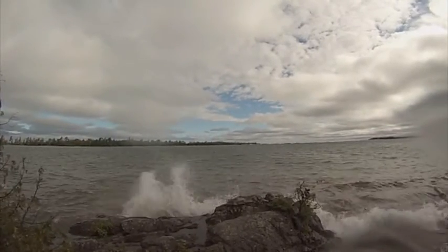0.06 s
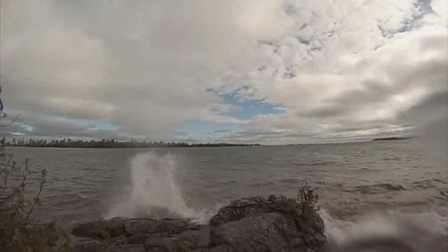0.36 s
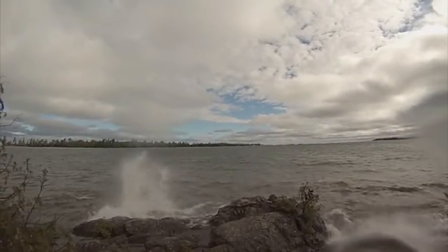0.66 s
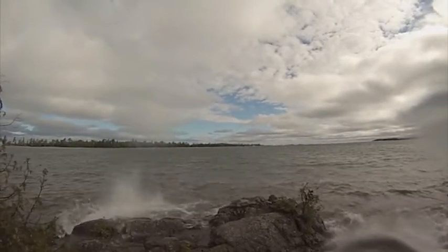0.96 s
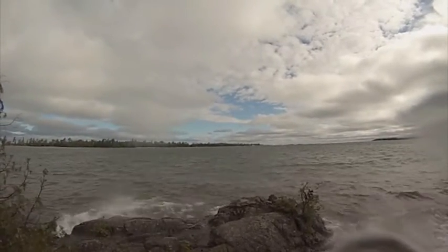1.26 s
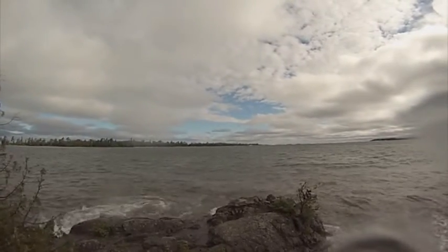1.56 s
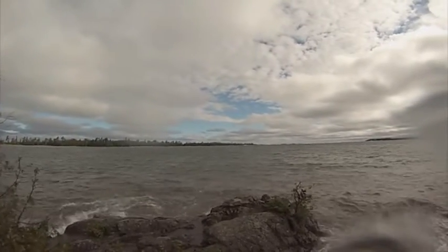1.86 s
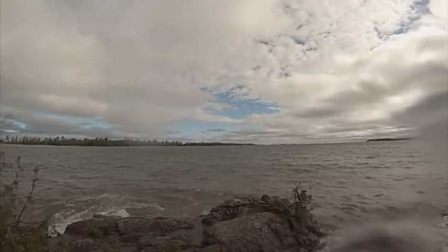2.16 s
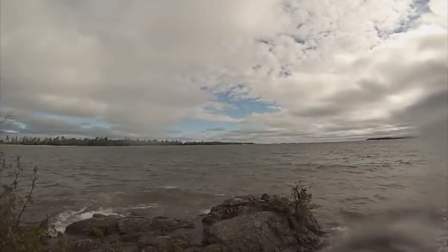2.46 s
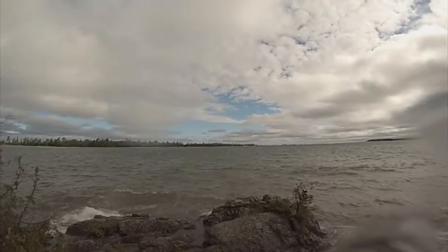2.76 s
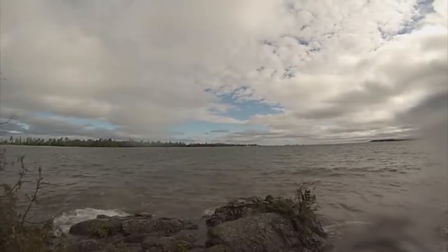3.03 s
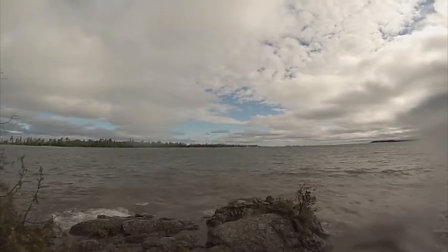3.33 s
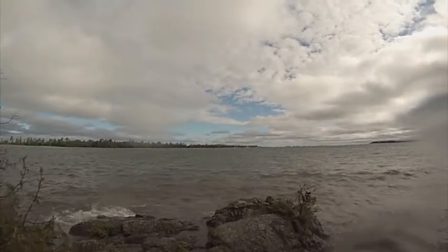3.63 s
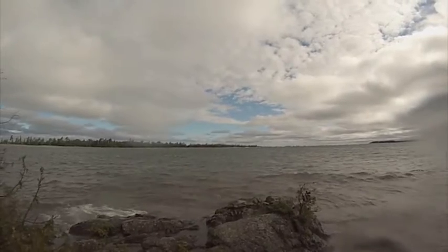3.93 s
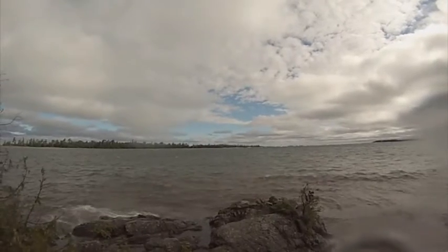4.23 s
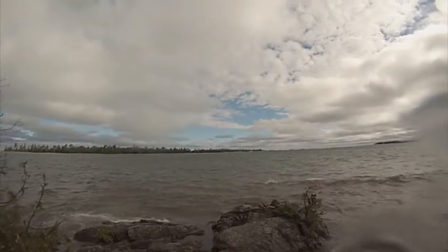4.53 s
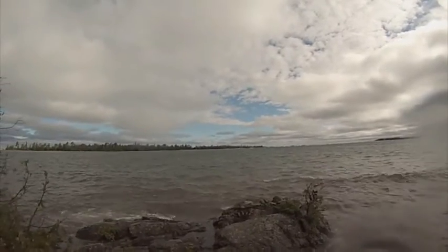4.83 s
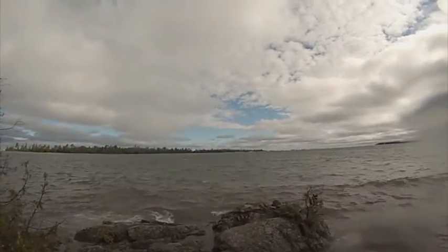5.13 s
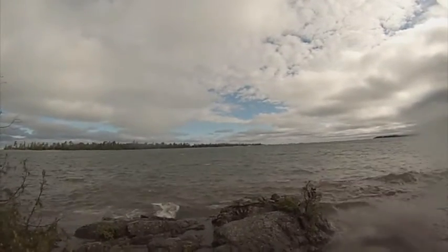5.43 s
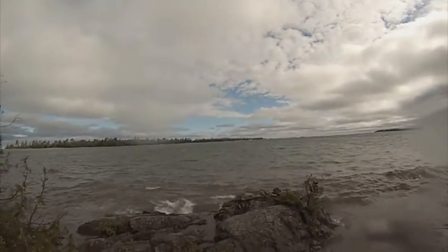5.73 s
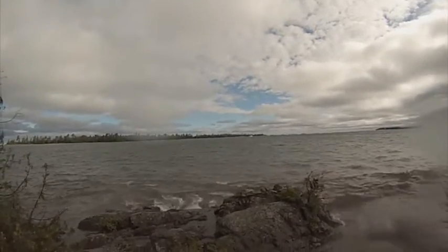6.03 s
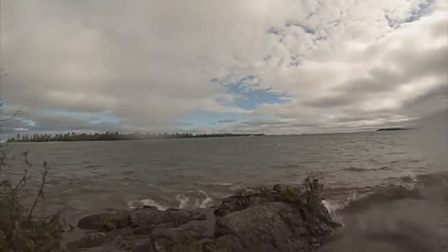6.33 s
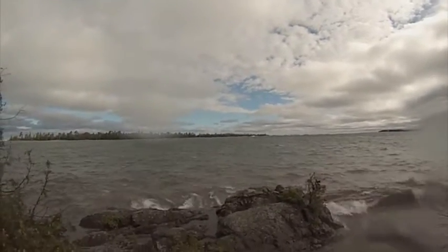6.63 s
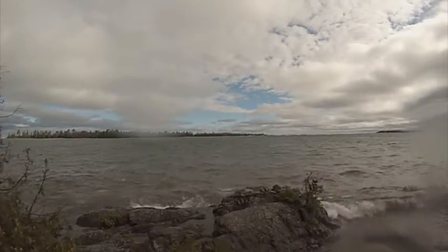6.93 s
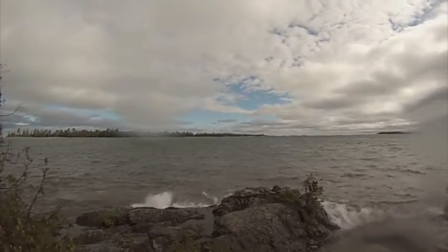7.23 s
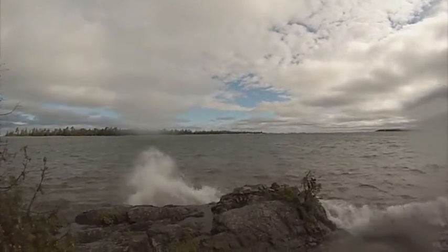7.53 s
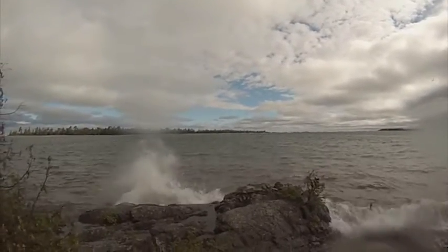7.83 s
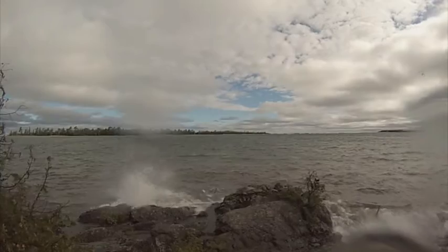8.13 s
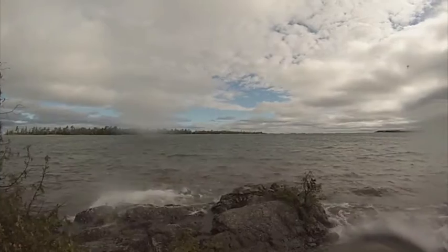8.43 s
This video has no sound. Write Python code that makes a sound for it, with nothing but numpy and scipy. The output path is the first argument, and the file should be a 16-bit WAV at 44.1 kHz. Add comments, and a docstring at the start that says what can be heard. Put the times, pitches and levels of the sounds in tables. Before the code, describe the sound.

Heard from inside a hollow waterproof case at the edge of a windy lake, a wave breaks on rocks with a low churn, bubbling foam and spray. It eases into gurgling small waves over a steady distant wash. Wind buffets the microphone more strongly, and a handful of sharp drop knocks and dull bumps strike the case. Then the water builds and another wave crashes, foaming and hissing.

```python
"""Wind-driven waves break on a rocky lake shore, heard from inside a hollow waterproof case.
At the start a big wave churns, foams with bubbles and throws up spray; fine drops tick as it drains.
Then small waves slosh, the lake washes on and gusts buffet the case. From about 4 s flying drops
knock on the case, soft bumps rock it and the next crest sizzles. That wave breaks at 7.2 s.
The case rings at its own pitches, which colours the sound of the water."""
import sys
import numpy as np
from scipy import signal
from scipy.io import wavfile
from scipy.ndimage import uniform_filter1d

SR = 44100
rng = np.random.default_rng(int(sys.argv[2]) if len(sys.argv) > 2 else 0)


def persist_wave(psi):
    """Save psi, clipped to +-1, as 16-bit WAV."""
    counts = np.round(np.clip(psi, -1, 1) * 32767).astype(np.int16)
    wavfile.write(sys.argv[1], SR, np.atleast_2d(counts).T)


N = 373968
TIME = np.arange(N) / SR

# big waves hitting the rocks: hit_s, strength_db, spray_stays_up_s, side_wash_db
BIG_WAVES = [(-0.2, -0.4, 1.39, -54.5), (7.2, -0.44, 1.19, -53)]
# small waves sloshing over the rocks: peak_s, level_db
SMALL_WAVES = [(0.42, -57), (1.12, -56.5), (1.88, -55.5), (2.83, -57), (3.448, -56), (3.97, -57.5),
               (4.55, -54.5), (5.3, -57), (5.85, -54), (7.2, -52.5), (8.06, -49)]
# how strong each sound is from low to high, in the open air: pitch_hz, relative_db
CHURN_TONE = [(60, -0.5), (150, -1), (290, -1), (450, -6), (700, -9.5), (1000, -10.5), (1400, -18.5),
              (3000, -37)]
FOAM_TONE = [(200, -3), (700, -10), (1000, -5.5), (1250, -3.5), (1600, 3.5), (2100, -2), (2800, -11),
             (4000, -15), (7000, -24), (15000, -46)]
SPRAY_TONE = [(1000, -9), (2200, -10.5), (3100, 3.5), (4200, -3), (5500, -2), (7000, -10), (8700, -14),
              (10500, -21.5), (12500, -29), (15000, -50)]
WIND_TONE = [(15, 11), (28, 0), (50, 3.5), (85, 0.5), (130, -7), (200, -15.5), (320, -26), (600, -33),
             (1500, -47)]
SPATTER_TONE = [(1800, 9), (5000, -1), (9000, -17), (13000, -21)]
LAKE_TONE = [(300, -7), (900, -1.5), (1700, 7.5), (2200, 3), (2900, -7), (4200, -12), (5500, -16),
             (7500, -20.5), (10000, -23), (13000, -25), (15000, -36)]
# pitches the hollow case boosts or weakens: pitch_hz, width_hz, gain_db
CASE_COLOUR = [(1250, 210, -7.5), (1530, 640, 8), (2130, 730, 3.5), (2520, 820, -2), (3593, 880, 7.5),
               (4150, 450, -4.5), (4910, 510, 6), (5400, 220, 0), (5580, 280, 1.5), (6250, 290, -8),
               (6530, 650, 4.5), (7680, 550, 4.5), (8800, 460, -2.5), (10440, 560, -3.5), (11160, 800, 2),
               (12250, 430, -8), (13000, 650, 0)]
# pitches of the case that a wash from the side stirs: pitch_hz, width_hz, relative_db
SIDE_RINGS = [(1580, 340, 0), (3560, 410, -7.5), (4730, 280, -10.5), (7650, 420, -15.5), (11300, 900, -30)]
# the breeze on the case: time_s, strength_db
BREEZE_CURVE = [(0, -50.5), (1.1, -56.5), (2.1, -52), (2.9, -44), (3.5, -43.5), (3.85, -49), (4.15, -41.5),
                (4.8, -45), (5.6, -45.5), (6.8, -45), (7.8, -48.5), (8.48, -49)]
# gusts on top of the breeze: peak_s, strength_db, half_length_s
WIND_GUSTS = [(0.35, -50, 0.032), (0.63, -49, 0.071), (0.86, -50.5, .07), (1.32, -48, 0.093),
              (1.81, -48.5, 0.08), (2.31, -45, 0.042), (2.53, -49, 0.089), (2.88, -44, 0.079),
              (3.45, -44.5, 0.044), (4.64, -40, 0.14), (5.09, -35, 0.027), (5.29, -41, 0.092),
              (5.82, -44.5, 0.14), (6.29, -43.5, 0.12), (7.24, -43.5, 0.095), (7.46, -44, .05),
              (8.08, -40, 0.046)]
# drops knocking on the case: start_s, force_db, contact_s, push_or_pull (+1 or -1), linger_share (0-1)
DROP_KNOCKS = [(4.3683, -19, 0.00068, -1, 0.3), (4.4722, -28, 0.00086, -1, 0.8),
               (5.2997, -14.5, 0.00059, 1, 0), (5.6811, -17.5, 0.00072, -1, 1),
               (6.9927, -13, 0.00053, -1, 0.21)]
# soft bumps on the case: same columns as the knocks
SOFT_BUMPS = [(4.548, -26.5, 0.0097, -1, 0.2), (4.593, -22, 0.0081, 1, 0), (4.6338, -25.5, 0.0029, -1, 0.7),
              (5.087, -22.5, 0.006, 1, 0.5), (5.122, -23.5, 0.015, 1, .1), (5.356, -25, 0.0036, 1, 0.5),
              (6.9965, -28, 0.0069, -1, 0), (8.085, -26, 0.019, 1, 0.3)]
# spurts of hiss from the incoming crest: peak_s, level_db, half_length_s
CREST_SPURTS = [(4.7, -71, .25), (5.55, -68, 0.25), (6.31, -57, 0.15), (6.5, -62, .15)]
# small showers landing nearby: peak_s, level_db, half_length_s
SHOWERS = [(1.918, -53.5, 0.054), (3.86, -63, 0.065), (4.094, -58, 0.014)]
# fine drops ticking close by: start_s, peak_db, pitch_hz
DROP_TICKS = [(1.672, -43.5, 6800), (1.692, -52, 11400), (1.770, -52, 11800), (1.900, -49, 8800),
              (1.921, -51, 11200), (2.132, -61, 11500), (2.173, -57, 10500), (2.215, -58, 11900)]

WAVE_HOLD_S = 0.69  # how long a big wave stays at full strength
CUTOFF_HZ = 15100  # the top of the treble


def churn():
    """Heaving water rumbles, and large air pockets gulp in it."""
    big_db = [wave_db(s, db - 50.5, rise_db_per_s=5.5, hold_s=WAVE_HOLD_S, fall_db_per_s=7.5)
              for s, db, _, _ in BIG_WAVES]
    level_db = together(-57.5, slosh_db() - 1.5, *big_db)  # some rumble stays between waves
    rumble = rush(CHURN_TONE, surge_db=-0.1, surge_hz=6.8, flicker_db=1.13, flicker_hz=17)
    gulps = bubbles(CHURN_TONE, per_s=300, low_hz=198, high_hz=1218, cycles=17, size_db=4)
    return from_db(level_db) * in_case(rumble + from_db(-9) * gulps)


def foam():
    """A breaking wave whips up a crowd of small, ringing bubbles."""
    levels_db = [wave_db(s, db - 52.18, rise_db_per_s=6.5, hold_s=WAVE_HOLD_S, fall_db_per_s=5.5)
                 for s, db, _, _ in BIG_WAVES]
    wash = rush(FOAM_TONE, surge_db=1.4, surge_hz=13, flicker_db=1.8, flicker_hz=16)
    froth = bubbles(FOAM_TONE, per_s=2500, low_hz=705, high_hz=4330, cycles=15, size_db=2.5)
    return from_db(together(*levels_db)) * in_case(wash + from_db(-2.5) * froth)


def spray():
    """A plume of drops hisses as it falls back; a fainter fizz comes earlier and outlasts it."""
    lead_s = 0.35  # the crest sheds spray just ahead of the hit
    levels_db = []
    for s, db, up_s, _ in BIG_WAVES:
        plume_db = wave_db(s - lead_s, db - 54.27, rise_db_per_s=12.5,
                           hold_s=lead_s + up_s, fall_db_per_s=50)
        fizz_db = wave_db(s, db - 58.77, rise_db_per_s=2, hold_s=up_s, fall_db_per_s=3.5)
        levels_db += [plume_db, fizz_db]
    hiss = rush(SPRAY_TONE, surge_db=1.1, surge_hz=9.5, flicker_db=1, flicker_hz=6.3)
    patter = bubbles(SPRAY_TONE, per_s=4300, low_hz=2530, high_hz=13700, cycles=3.2, size_db=1.5)
    return from_db(together(*levels_db)) * in_case(hiss + from_db(-4) * patter)


def side_wash():
    """Water arriving from the side makes a few of the case's pitches ring strongly."""
    levels_db = [wave_db(s, side_db, rise_db_per_s=11, hold_s=WAVE_HOLD_S, fall_db_per_s=15)
                 for s, _, _, side_db in BIG_WAVES]
    wash = rng.standard_normal(N) * from_db(drift(24))
    hollow = sum(from_db(db) * ring_twice(wash, hz, width_hz) for hz, width_hz, db in SIDE_RINGS)
    return from_db(together(*levels_db)) * rms_one(hollow)


def slosh_db():
    """The level of the small waves: each rises fast and drains more slowly."""
    levels_db = [wave_db(s, db, rise_db_per_s=49, hold_s=0, fall_db_per_s=23) for s, db in SMALL_WAVES]
    return together(-59, *levels_db)  # the water never rests


def backwash():
    """Small waves gurgle over the rocks, duller than the foam of a big one."""
    wash = rush(FOAM_TONE, surge_db=1.1, surge_hz=14, flicker_db=1.1, flicker_hz=14)
    gurgle = bubbles(FOAM_TONE, per_s=2000, low_hz=690, high_hz=2990, cycles=12, size_db=2.5)
    return from_db(slosh_db()) * in_case(low_pass(wash + from_db(-4.5) * gurgle, hz=4800))


def wind():
    """Swirls of air buffet the case; stronger gusts shed smaller, brighter swirls."""
    breeze_db = np.interp(TIME, *np.transpose(BREEZE_CURVE))
    strength_db = 20 * np.log10(np.hypot(from_db(breeze_db), swells(WIND_GUSTS)))
    swirls = rush(WIND_TONE, surge_db=1, surge_hz=29, flicker_db=1, flicker_hz=8.5)
    swirls /= np.sqrt(uniform_filter1d(swirls ** 2, size=5000))  # even out the slow swings
    small_swirls = low_pass(ring(rng.standard_normal(N), hz=195, width_hz=124), hz=450)
    flutter = rms_one(small_swirls * np.abs(swirls))  # small swirls ride on the large ones
    flutter_db = -11 + 0.5 * (strength_db + 31)
    return from_db(strength_db + 1.88) * (swirls + from_db(flutter_db) * flutter)


def touch_force(touches):
    """Each touch is a smooth hump of force, part of which lingers and drains away."""
    force = np.zeros(N)
    for start_s, db, contact_s, push_or_pull, linger_share in touches:
        progress = np.maximum(TIME - start_s, 0) / contact_s
        hump = np.sin(np.pi * np.minimum(progress, 1)) ** 2
        drain = progress ** 2 * np.exp(2 - 2 * progress)
        force += push_or_pull * from_db(db) * (hump + linger_share * drain)
    return force


def case_blows():
    """A blow squeezes the air in the case, rings its shell and rocks it on its mount."""
    force = touch_force(DROP_KNOCKS) + touch_force(SOFT_BUMPS)
    squeeze = signal.sosfilt(signal.butter(1, 50, "high", fs=SR, output="sos"), force)
    # the hollow soaks up its own note, leaving a ring on either side of it
    squeeze -= ring(squeeze, hz=1550, width_hz=340)
    shell = 1.82 * ring(squeeze, hz=1440, width_hz=286) + ring(squeeze, hz=1900, width_hz=260)
    mount = 0.3 * ring(force, hz=52, width_hz=38) + 0.5 * ring(force, hz=120, width_hz=160)
    return 0.57 * squeeze + shell + mount


def crest_sizzle():
    """The incoming crest gives off spurts of narrow, almost whistling hiss."""
    hiss = ring_twice(rng.standard_normal(N), hz=4990, width_hz=420)
    return swells(CREST_SPURTS) * rms_one(hiss)


def spatter():
    """A small shower of drops lands as a short, bright crackle."""
    drops = bubbles(SPATTER_TONE, per_s=2600, low_hz=1780, high_hz=12500, cycles=13, size_db=2.5)
    return swells(SHOWERS) * drops


def droplets():
    """Tiny drops burst with a short, bright tick."""
    out, fade_s = np.zeros(N), 0.00046
    for start_s, peak_db, hz in DROP_TICKS:
        fade = (TIME >= start_s) * np.exp(-np.abs(TIME - start_s) / fade_s)
        burst = rng.standard_normal(N) * fade
        tick = ring_twice(burst, hz, width_hz=1700) + 0.08 * low_pass(burst, hz=7000)
        out += from_db(peak_db) * tick / np.max(np.abs(tick))
    return out


def lake():
    """Distant waves wash on; coming from all sides, they take on less of the case's colour."""
    wash = rush(LAKE_TONE, surge_db=0.5, surge_hz=4.2, flicker_db=1.5, flicker_hz=20)
    return from_db(-56) * in_case(wash, depth=0.2)


def in_case(sound, depth=1):
    """The hollow case boosts some pitches and weakens others; the result has level one."""
    for hz, width_hz, db in CASE_COLOUR:
        gain = from_db(depth * db / 2)
        width = np.pi * width_hz / SR
        tuning = -2 * np.cos(2 * np.pi * hz / SR)
        sound = signal.lfilter([1 + width * gain, tuning, 1 - width * gain],
                               [1 + width / gain, tuning, 1 - width / gain], sound)
    return rms_one(sound)


def rush(tone, surge_db, surge_hz, flicker_db, flicker_hz):
    """Swirling water or air: bands of noise that surge together and flicker separately."""
    edges_hz = np.geomspace(14, 18000, 22)  # half an octave apart
    noise = rng.standard_normal((2, N))
    surge = from_db(surge_db * drift(surge_hz))
    out = np.zeros(N)
    for k, (low, high) in enumerate(zip(edges_hz, edges_hz[1:])):
        hz = np.sqrt(low * high)
        if tone[0][0] / 2 < hz < tone[-1][0] * 2:
            band_filter = signal.butter(2, [low, high], "band", fs=SR, output="sos")
            band = signal.sosfilt(band_filter, noise[k % 2])
            out += band * from_db(tone_db(tone, hz) + flicker_db * drift(flicker_hz))
    return rms_one(out * surge)


def bubbles(tone, per_s, low_hz, high_hz, cycles, size_db, pitches=24):
    """Bubbles of all sizes are born at random and ring for a few cycles each."""
    sizes = from_db(size_db * np.minimum(rng.exponential(1, N), 4))
    signs = rng.choice([-1, 1], N)
    births = sizes * signs * (rng.random(N) < per_s / SR)
    pitch_index = rng.integers(0, pitches, N)
    out = np.zeros(N)
    for k, hz in enumerate(np.geomspace(low_hz, high_hz, pitches)):
        out += from_db(tone_db(tone, hz)) * ring(births * (pitch_index == k), hz, 2 * hz / cycles)
    return rms_one(out)


def wave_db(peak_s, db, rise_db_per_s, hold_s, fall_db_per_s):
    """The level of one wave: it builds until peak_s, holds, then drains."""
    before_s = np.maximum(peak_s - TIME, 0)
    after_s = np.maximum(TIME - peak_s - hold_s, 0)
    return db - rise_db_per_s * before_s - fall_db_per_s * after_s


def swells(rows):
    """Rounded rises and falls in level, joined into one gain."""
    gains = [from_db(db) * np.exp(-((TIME - s) / half_s) ** 2) for s, db, half_s in rows]
    return np.sqrt(sum(gain ** 2 for gain in gains))


def together(*levels_db):
    """The level of unrelated sounds heard at once, in dB."""
    return 10 * np.log10(sum(10 ** (db / 10) for db in levels_db))


def drift(rate_hz):
    """A smooth random wobble with a typical size of one."""
    step, warm_up = 40, 2000  # samples per point; points skipped while it settles
    decay = np.exp(-2 * np.pi * rate_hz * step / SR)
    noise = rng.standard_normal(N // step + warm_up + 2)
    slow = signal.lfilter([1], [1, -2 * decay, decay ** 2], noise)[warm_up:]
    return np.interp(np.arange(N) / step, np.arange(len(slow)), rms_one(slow))


def ring(sound, hz, width_hz):
    """Ring at one pitch; a narrower width rings longer."""
    decay = np.exp(-np.pi * width_hz / SR)
    feed = np.array([1, 0, -1]) * (1 - decay ** 2) / 2
    feedback = [1, -2 * decay * np.cos(2 * np.pi * hz / SR), decay ** 2]
    return signal.lfilter(feed, feedback, sound + 1e-18)


def ring_twice(sound, hz, width_hz):
    """Two rings in a row pick out a pitch more sharply."""
    return ring(ring(sound, hz, width_hz), hz, width_hz)


def low_pass(sound, hz, order=2):
    """Dull a sound above hz."""
    return signal.sosfilt(signal.butter(order, hz, fs=SR, output="sos"), sound)


def tone_db(tone, hz):
    """Read a tone table at any pitch."""
    pitches_hz, levels_db = np.transpose(tone)
    return np.interp(np.log(hz), np.log(pitches_hz), levels_db)


def from_db(db):
    """Turn decibels into a gain."""
    return 10 ** (np.asarray(db) / 20)


def rms_one(sound):
    """Scale to an average (rms) level of one."""
    return sound / np.sqrt(np.mean(sound ** 2) + 1e-20)


def scene():
    """Water, wind and blows on the case, in one channel."""
    water = lake() + churn() + foam() + spray() + side_wash() + backwash()
    drops = crest_sizzle() + spatter() + droplets()
    return (water + drops + wind() + case_blows())[None, :]


def record(dry):
    """The highest treble droops, then is cut steeply."""
    soft = low_pass(dry, hz=14200, order=6)
    return signal.sosfilt(signal.ellip(12, 0.1, 80, CUTOFF_HZ, fs=SR, output="sos"), soft)


dry = scene()
out = record(dry)
persist_wave(out)
```